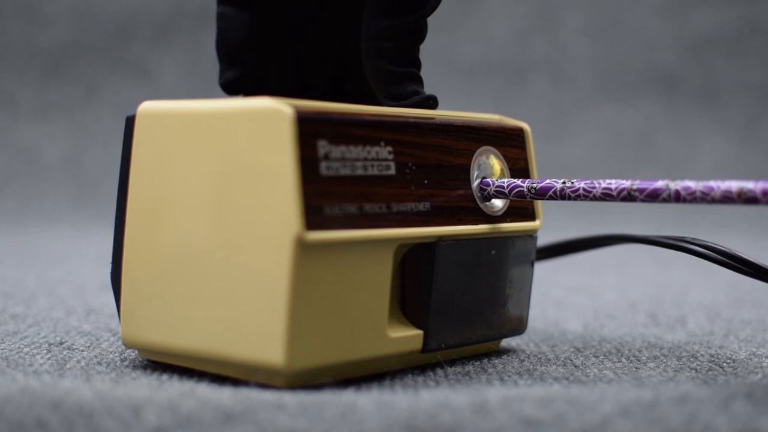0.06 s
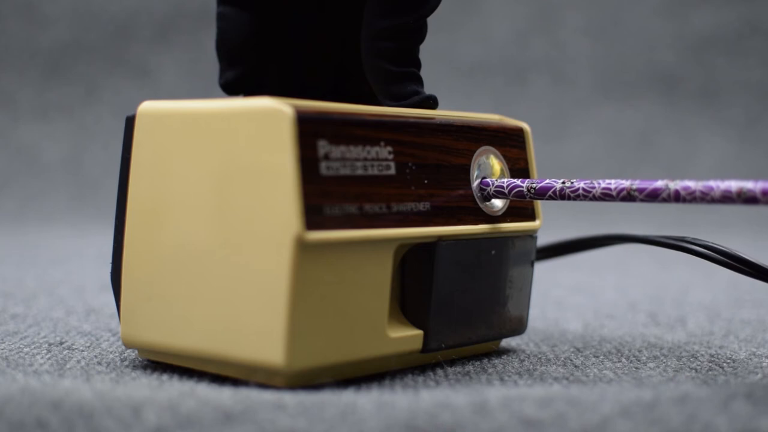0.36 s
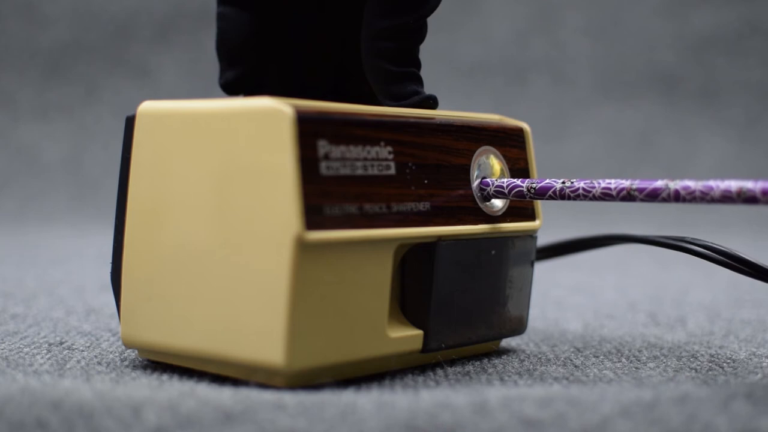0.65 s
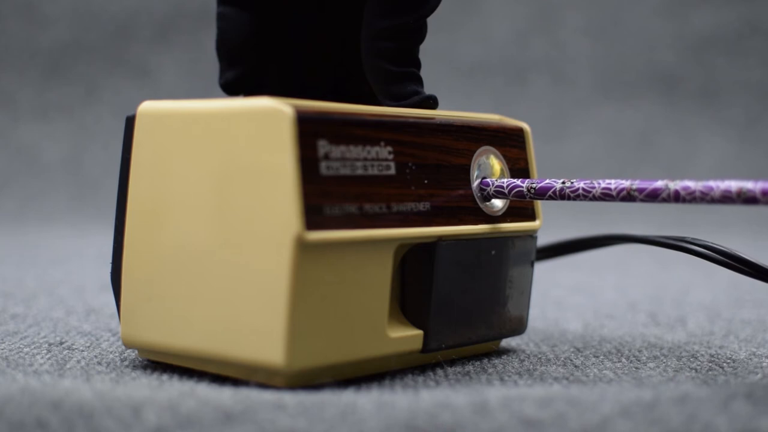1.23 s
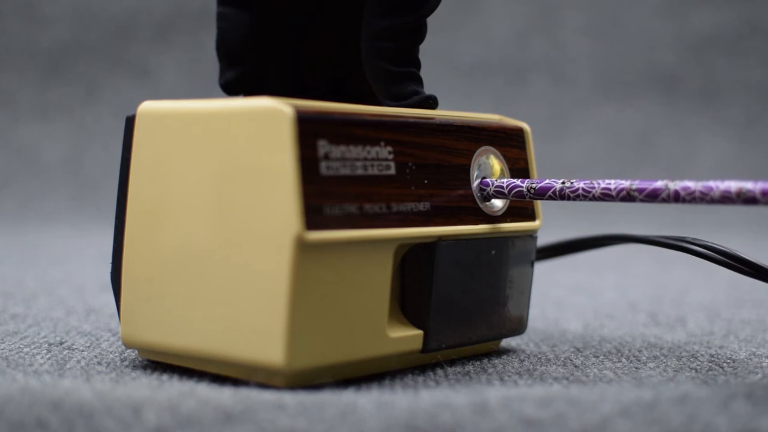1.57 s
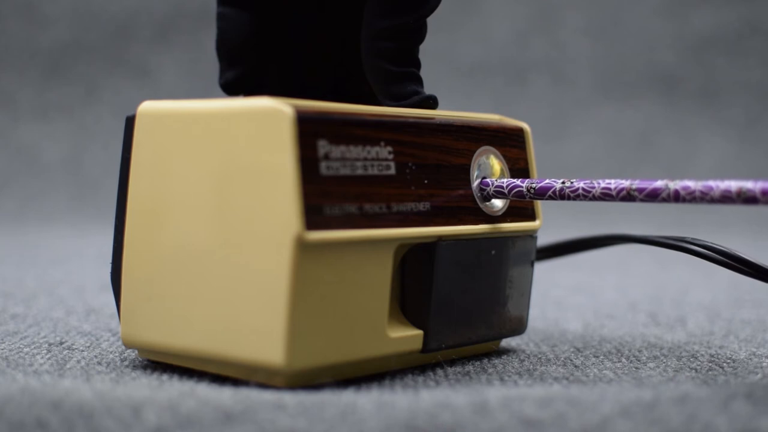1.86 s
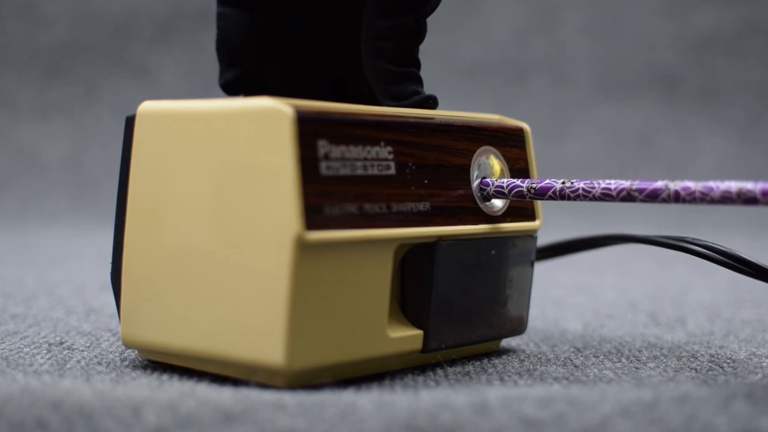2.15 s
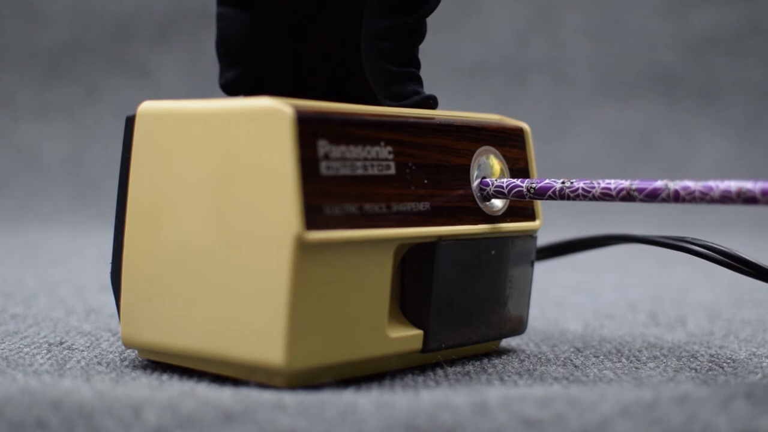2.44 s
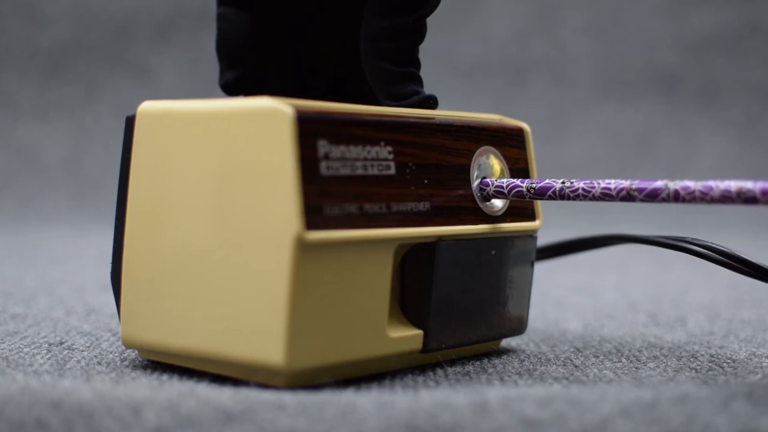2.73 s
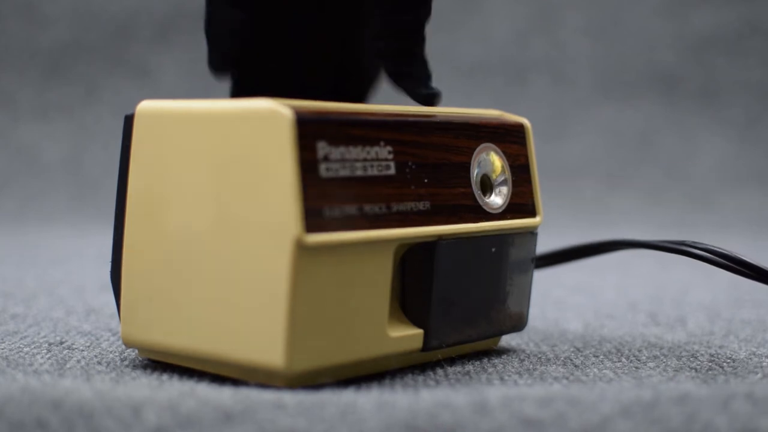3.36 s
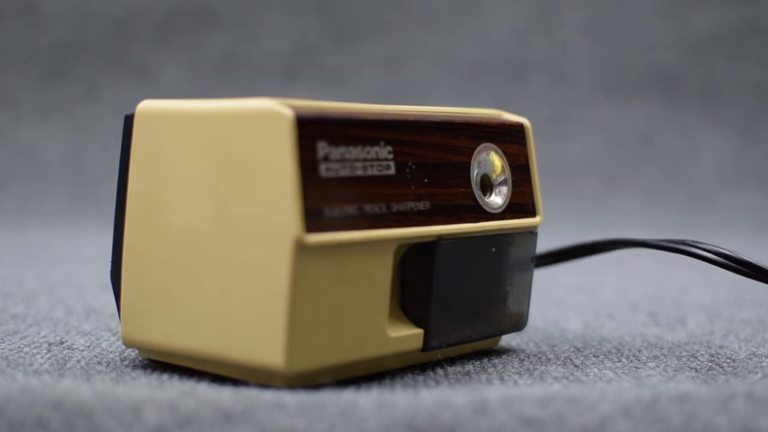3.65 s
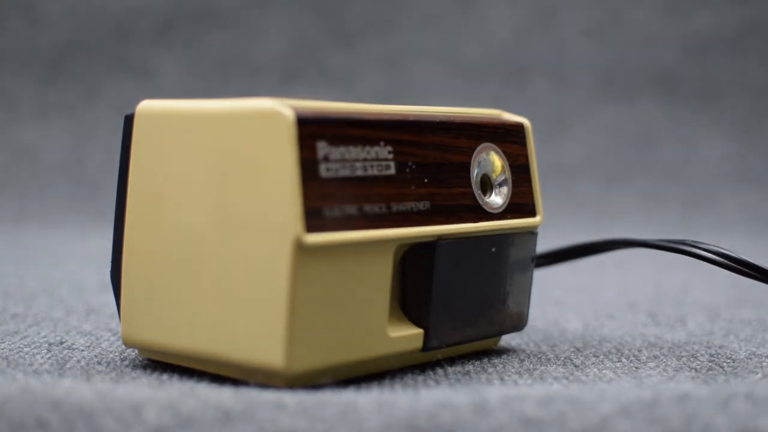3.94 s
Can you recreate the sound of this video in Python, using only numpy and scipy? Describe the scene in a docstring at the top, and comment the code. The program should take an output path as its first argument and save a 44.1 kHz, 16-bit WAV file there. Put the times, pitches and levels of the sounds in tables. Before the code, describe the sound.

Close up in a quiet room, an electric pencil sharpener runs with whining, chattering gears and a quickly pulsing rasp of shaved wood. The grinding ends as the pencil is withdrawn, and the whine sinks away with a few clicks.

```python
"""Electric pencil sharpener, close by.

A mains motor turns a pinion whose teeth whine and chatter in the plastic case; the cutter circles
the pencil and bites twice a turn. The pencil is pulled out, the motor switches off, and the gears
coast to a stop with falling tones and a few rattles."""
import sys
import numpy as np
from scipy import signal
from scipy.fft import rfft, irfft, next_fast_len
from scipy.io import wavfile
from scipy.ndimage import uniform_filter1d

SR = 44100
rng = np.random.default_rng(int(sys.argv[2]) if len(sys.argv) > 2 else 0)


def inscribe(sig):
    """Save sig as 16-bit PCM at rate SR to the path in sys.argv[1].

    A 1-D sig is mono; a 2-D sig holds one channel per row.
    Samples are clipped to [-1, 1] before scaling.
    """
    pcm = np.round(np.clip(np.atleast_2d(sig).T, -1, 1) * 32767)
    wavfile.write(sys.argv[1], SR, pcm.astype(np.int16))


N = 176400
T = np.arange(N) / SR
PINION_TEETH, WHEEL_TEETH, MAINS_HZ = 12, 115, 60

# Case response: freq_hz, gain_db
CASE_COLOUR = [(30, -65), (100, -24.5), (190, -24), (250, -12), (490, -14), (560, -7), (680, -1.5),
               (830, 0.5), (1150, 0), (1650, -3.5), (2200, -5), (2450, -8.5), (3200, -12), (4400, -16.5),
               (5600, -29), (8200, -26), (10000, -43), (15000, -35)]
# Case and frame resonances: freq_hz, width_hz, height_db
CASE_MODES = [(692, 98, 6), (932, 51, 2.5), (1365, 54, 7.5), (1869, 35, 5.5), (2144, 49, 6),
              (2275, 70, 4.5), (2530, 21, 5), (2660, 40, 6.5), (2790, 51, 11.5), (3083, 63, 6),
              (3440, 110, 6), (4400, 140, 2.5), (8555, 710, 10.5)]


def undb(db):
    """Decibels to gain."""
    return 10 ** (np.asarray(db) / 20)


def level(x, rms_db):
    """Set the rms level."""
    return x * undb(rms_db) / np.std(x)


def curve(rows):
    """Join (time_s, value) rows by straight lines."""
    return np.interp(T, *np.array(rows).T)


def walk(rate_hz):
    """Smooth random drift, spread near 1."""
    hold = int(SR / rate_hz)
    steps = np.repeat(rng.standard_normal(N // hold + 1), hold)
    return 1.206 * uniform_filter1d(uniform_filter1d(steps, hold), hold)[:N]


def cycle(turns):
    """Cosine peaking at each whole turn."""
    return np.cos(2 * np.pi * turns)


def shape_db(hz, points):
    """Interpolate (freq_hz, gain_db) rows on a log-frequency axis."""
    freq_hz, gain_db = np.array(points).T
    return np.interp(np.log(hz + 1), np.log(freq_hz), gain_db)


def colour(x, points, modes=()):
    """Minimum-phase filter: broad colour plus ringing resonances."""
    size = next_fast_len(N + SR // 4, real=True)
    size += size % 2
    hz = np.fft.rfftfreq(size, 1 / SR)
    peaks_db = sum(height / (1 + (2 * (hz - centre) / width) ** 2) for centre, width, height in modes)
    cepstrum = irfft(np.log(undb(shape_db(hz, points) + peaks_db)))
    cepstrum[1:size // 2] *= 2
    cepstrum[size // 2 + 1:] = 0
    return irfft(rfft(x, size) * np.exp(rfft(cepstrum)))[:N]


def grains(per_s, scatter_db):
    """Random tiny impacts of uneven size."""
    hits = (rng.random(N) < per_s / SR) * rng.choice([-1, 1], N)
    return hits * undb(scatter_db * np.clip(rng.standard_normal(N), -2, 2))


def burst(force, points):
    """Brief rough contact that rings the case."""
    noise = rng.standard_normal(N)
    return colour(force * noise, points, CASE_MODES) / np.std(colour(noise, points, CASE_MODES))


def tooth_strikes(turns, pace):
    """One impulse per meshing tooth; single ticks stand out as the gears slow."""
    jitter_s, scatter_db, slow_boost_db = 0.00016, 5, 12.5
    teeth = np.arange(1, int(turns[-1] * PINION_TEETH))
    lateness, strength = rng.standard_normal((len(teeth), 2)).T
    strike_s = np.interp(teeth, turns * PINION_TEETH, T) + jitter_s * lateness
    position = np.clip(strike_s * SR, 0, N - 2)
    sample, fraction = position.astype(int), position % 1
    size = undb(scatter_db * pace[sample] * strength + slow_boost_db * (1 - pace[sample]))
    return np.bincount(sample, size * (1 - fraction), N) + np.bincount(sample + 1, size * fraction, N)


def gear_rattle(turns, pace, power, bite):
    """Teeth strike and chatter in their play; load, mains ripple and runout sway the force."""
    # Rattle in the play, strongest once freed of the pencil: time_s, gain_db
    slack = [(1.45, -0.2), (1.67, -1.5), (2.1, -0.8), (2.86, 0), (2.93, 1.5), (3.0, 3), (3.12, 0),
             (3.3, 1.5), (3.45, -2)]
    bite_db, ripple_db, runout_db = 1.2, 1.34, 1.3
    strikes_db, chatter_db, soften_hz = -45, -43, 1290
    strikes = tooth_strikes(turns, pace)
    chatter = grains(per_s=4000 * pace ** 2, scatter_db=4)
    sway_db = power * (bite_db * bite + ripple_db * cycle(2 * MAINS_HZ * T)) + runout_db * cycle(turns)
    force = undb(sway_db + curve(slack)) * pace ** 0.97
    hardness = pace ** 0.93  # slower teeth strike duller
    out = 0
    for hits, rms_db in (strikes, strikes_db), (chatter, chatter_db):
        soft = signal.lfilter(*signal.butter(1, soften_hz, fs=SR), hits)
        contact = force * (hardness * hits + (1 - hardness) * soft)
        out += level(colour(contact, CASE_COLOUR, CASE_MODES), rms_db)
    return out


def gear_whine(turns, speed_hz, power):
    """Tooth-rate harmonics, shaken by torque ripple and backlash, fading as the gears slow."""
    # Harmonics 1 to 8, before fade and frame gain: driven_db, coasting_db
    harmonics = [(-56, -50), (-56, -45), (-75, -47), (-54, -49.5), (-70.5, -51.5), (-77, -62), (-79, -60),
                 (-78.5, -56.5)]
    # Frame radiation, applied when coasting: freq_hz, gain_db
    frame = [(300, -19), (520, -12), (660, -3.5), (800, -6), (950, 2), (1170, 3), (1350, -4.5), (1550, 5),
             (1850, -5), (2250, -9), (2500, 3.5), (2850, 7), (3050, -3), (3600, -40)]
    # Fade during run-down: time_s, gain_db
    fade = [(3.0, 10.5), (3.06, 0.5), (3.105, 4), (3.17, -2.5), (3.232, 0), (3.28, -4), (3.38, -4),
            (3.46, -11), (3.56, -16), (3.65, -30)]
    wobble_rad, ripple_rad, backlash_rad, flutter_db = 0.44, 0.3, 0.11, 4
    phase = 2 * np.pi * PINION_TEETH * turns + wobble_rad * walk(40)
    phase += ripple_rad * power * cycle(2 * MAINS_HZ * T) + backlash_rad * walk(400)
    out = 0
    for k, (driven_db, coasting_db) in enumerate(harmonics, 1):
        radiated_db = coasting_db + shape_db(k * PINION_TEETH * speed_hz, frame)
        db = power * driven_db + (1 - power) * radiated_db + flutter_db * walk(110)
        out += undb(db) * np.sin(k * phase)
    return out * undb(curve(fade))


def shaving(turns, cutter_turns, bite):
    """Wood fibres snap under the cutter's flutes, hardest at each bite, and ring the case."""
    # Pencil pressure on the cutter: time_s, gain_db
    pressure = [(0, 0), (.25, 1.5), (.38, 3), (.62, 0.9), (1.02, 2.2), (1.3, 0.5), (1.39, 3), (1.47, 1),
                (1.59, 3), (1.67, 0.5), (1.8, 1.5), (1.92, 0), (2.12, 0.5), (2.23, 1.7), (2.6, 2.5),
                (2.78, 1), (2.91, -2), (2.94, -18), (3.1, -7), (3.16, -44)]
    # Shaving spectrum: freq_hz, gain_db
    wood_colour = [(200, -20), (700, -1), (1100, 16), (1700, 20.5), (2300, 11.5), (3000, 6), (4400, -1),
                   (5500, -5), (7000, -4), (7700, 1.5), (8500, -6), (9200, -7), (9900, -12.5),
                   (11500, -1.5), (12800, 0.5), (14000, -4), (15800, -10.5)]
    bite_db, orbit_db, flute_db, runout_db, wood_grain_db = 2.5, 1.1, 1.5, 0.5, 2.13
    deepest_cut_turns, flutes_per_turn = 0.71, 22.75
    snaps = grains(per_s=18000, scatter_db=3.5)
    cut_db = curve(pressure) + bite_db * bite + orbit_db * cycle(cutter_turns - deepest_cut_turns)
    cut_db += flute_db * cycle(flutes_per_turn * cutter_turns) + runout_db * cycle(turns)
    cut_db += wood_grain_db * walk(170)
    return level(colour(snaps * undb(cut_db), wood_colour, CASE_MODES), rms_db=-43.5)


def knocks():
    """The cutter catches, loose parts knock on the case and the wood splinters, each with a sharp click."""
    # Cutter catches, part knocks and wood cracks: start_s, level_db, click_gain_db, click_decay_s
    impacts = [(.062, -36, -17, .003), (0.41, -32, -19, .004), (0.522, -35, -28, .004),
               (.765, -35, -22, .004), (0.947, -32.5, -23, .004), (1.002, -37, -18, .002),
               (1.112, -32, -20, .003), (1.804, -35.5, -21, .004), (1.861, -45, -3, .002),
               (2.144, -36, -11, .002), (2.235, -38.5, -3.5, .004), (2.495, -35, -13, .004),
               (2.669, -34, -22, .004), (2.832, -35, -19, .002), (2.986, -33, -16, .004),
               (3.066, -37.5, -11, .004), (3.104, -35, -18, 0.0034), (3.177, -43, -6, .002),
               (3.228, -40.5, -14, .002), (3.237, -45, -8, .002), (3.293, -39.5, -12, .003),
               (3.346, -45.5, -20, .003), (3.4228, -51.5, -3, .0012), (3.4305, -56, -2, .0015),
               (3.4647, -51.5, -3, .0012), (3.526, -59, -7, .003), (3.5385, -48, -16, .0012)]
    # Click spectrum: freq_hz, gain_db
    click_colour = [(100, -45.5), (500, -32), (2500, -3), (4300, 4), (6500, 0), (8500, -5), (10000, -29),
                    (15000, -21)]
    attack_s, decay_s = 0.0014, 0.0059
    thud, click = np.zeros(N), np.zeros(N)
    for start_s, level_db, click_gain_db, click_decay_s in impacts:
        age_s = np.maximum(T - start_s, 0)
        rise = np.clip((T - start_s) / attack_s + 1, 0, 1)
        thud += rise * undb(level_db) * np.exp(-age_s / decay_s)
        click += (T >= start_s) * undb(level_db + click_gain_db) * np.exp(-age_s / click_decay_s)
    return burst(thud, CASE_COLOUR) + burst(click, click_colour)


def drive_hum(power):
    """Motor hum and steady gear-mesh tones that waver and stop at switch-off."""
    # Motor and gear-mesh tones: pitch_hz, rms_db
    tones = [(55.3, -87), (114, -82.5), (120, -85), (166, -86), (405, -78.5), (526, -64.5), (600, -63),
             (663, -60), (948, -51.5), (1068, -57.5), (1188, -56), (1334, -57.5), (1445, -56.5)]
    waver_db, waver_rad = 2.6, 0.52
    out = 0
    for pitch_hz, rms_db in tones:
        amplitude = np.sqrt(2) * undb(rms_db + waver_db * walk(34.91))
        phase = 2 * np.pi * (pitch_hz * T + rng.random()) + waver_rad * walk(14)
        out += amplitude * np.sin(phase)
    return power * out


def withdrawal():
    """The pencil's point ticks over the flutes on its way out."""
    # Point contacts: centre_s, length_s, level_db
    scrapes = [(2.992, .008, -50), (3.055, .006, -48), (3.07, 0.0098, -50), (3.087, .005, -53),
               (3.108, .014, -52), (3.121, 0.009, -48.5), (3.132, .006, -56.5)]
    # Scrape spectrum: freq_hz, gain_db
    scrape_colour = [(200, -27), (1200, -3), (3000, 0), (5500, -4), (7500, -1), (8700, 8.5), (9800, -18),
                     (13000, -12), (15500, -10)]
    touch = sum(undb(level_db) * np.exp(-(2 * (T - centre_s) / length_s) ** 2)
                for centre_s, length_s, level_db in scrapes)
    friction = colour(grains(per_s=1500, scatter_db=6.5), scrape_colour)
    return touch * level(friction, rms_db=0)


def bearings(turns):
    """The shaft rubs in dry bearings, harder once a turn, until it stops."""
    # Rubbing spectrum: freq_hz, gain_db
    rub_colour = [(100, -46), (450, -20.5), (600, -11), (700, 4), (800, -1.5), (970, 0), (1250, -6),
                  (1600, -6.5), (1900, -17), (2250, -11), (2500, -24), (2850, -11.5), (3200, -29),
                  (6000, -30), (12000, -49)]
    stop_s, fade_s, swing_db = 3.75, 0.21, 0.83
    contact = np.clip((stop_s - T) / fade_s, 0, 1) * undb(swing_db * cycle(turns))
    friction = contact * grains(per_s=2000, scatter_db=2.5)
    return level(colour(friction, rub_colour), rms_db=-58)


def room():
    """Faint steady room noise."""
    # Room spectrum: freq_hz, gain_db
    room_colour = [(15, -41), (25, -7), (86, -15.5), (119, -5), (144, -10.5), (509, -10), (762, -11),
                   (1170, -18), (15500, -19)]
    return level(colour(rng.standard_normal(N), room_colour), rms_db=-75.5)


def scene():
    """Motor speed drives gears and cutter; mono."""
    # Motor run and coast-down: time_s, speed_hz
    motor_speed = [(0, 55.3), (1.3, 55.3), (2.4, 55.1), (2.7, 55.2), (2.9, 56.0), (3.0, 56.0), (3.11, 48.4),
                   (3.2, 41.2), (3.3, 33.4), (3.45, 21.9), (3.6, 11), (3.74, 0)]
    first_bite_s, switch_off_s, switch_fade_s = 0.068, 3.03, 0.035
    speed_hz = curve(motor_speed)
    turns, pace = np.cumsum(speed_hz) / SR, speed_hz / speed_hz[0]
    power = np.clip((switch_off_s - T) / switch_fade_s + 0.5, 0, 1)
    cutter_turns = (turns - first_bite_s * speed_hz[0]) * PINION_TEETH / WHEEL_TEETH
    bite = cycle(2 * cutter_turns) - 0.26 * cycle(4 * cutter_turns)  # sharp release between bites
    background = room()
    gears = gear_rattle(turns, pace, power, bite) + gear_whine(turns, speed_hz, power)
    drive = drive_hum(power) + bearings(turns)
    pencil = shaving(turns, cutter_turns, bite) + withdrawal()
    return (gears + drive + pencil + knocks() + background)[None]


def record(dry):
    """Steep elliptic low-pass."""
    cutoff_hz = 15800
    return signal.sosfilt(signal.ellip(10, 0.2, 70, cutoff_hz, fs=SR, output="sos"), dry)


dry = scene()
out = record(dry)
inscribe(out)
```